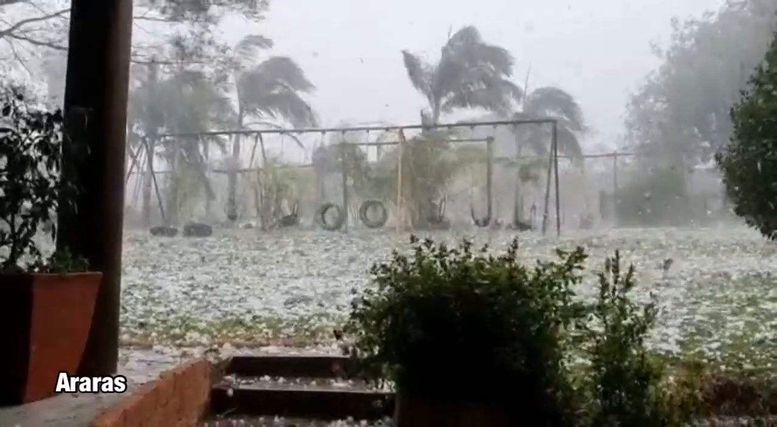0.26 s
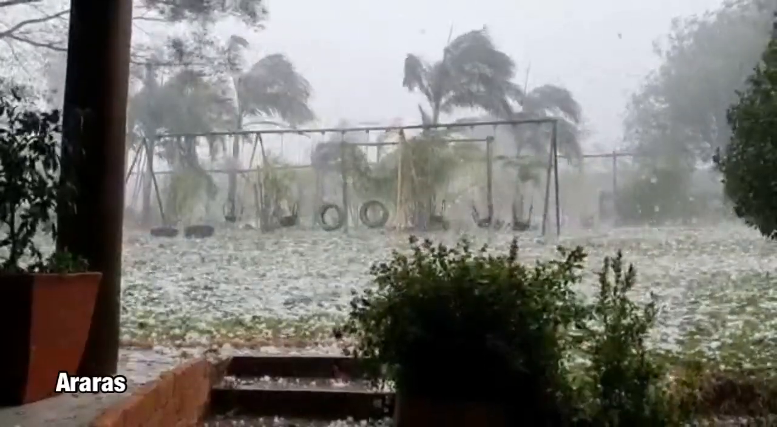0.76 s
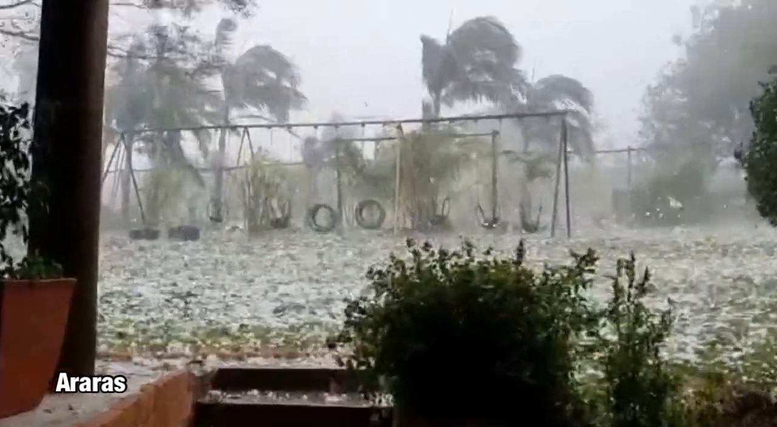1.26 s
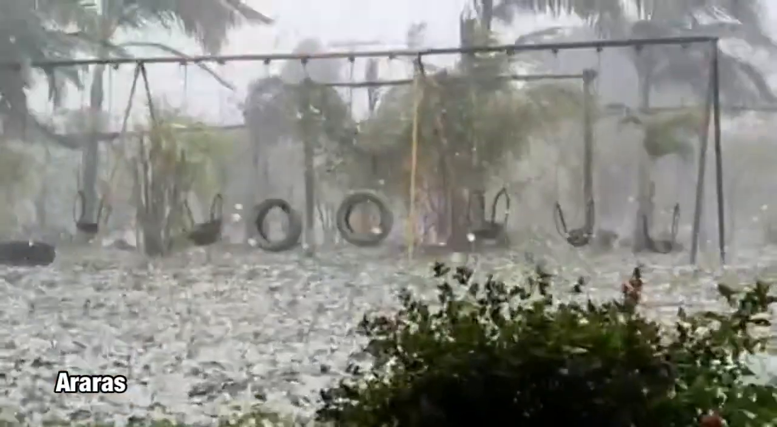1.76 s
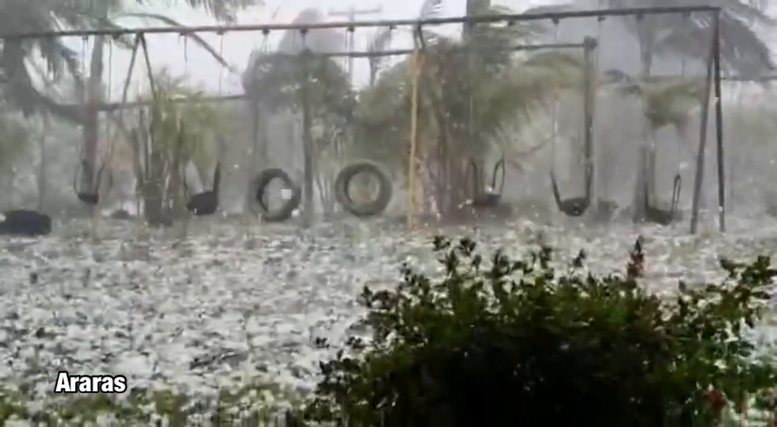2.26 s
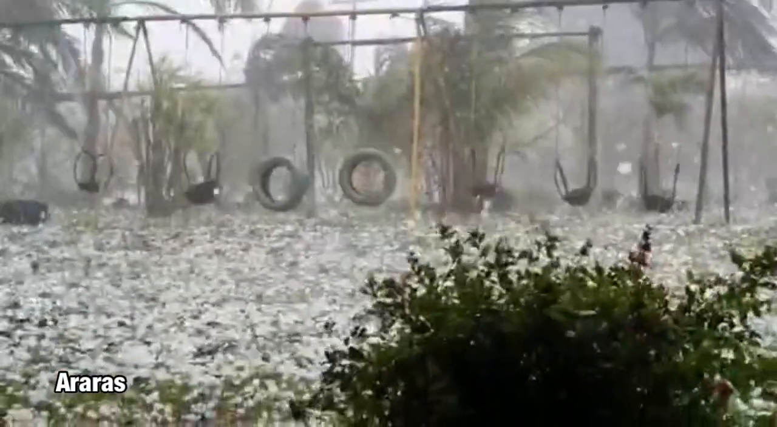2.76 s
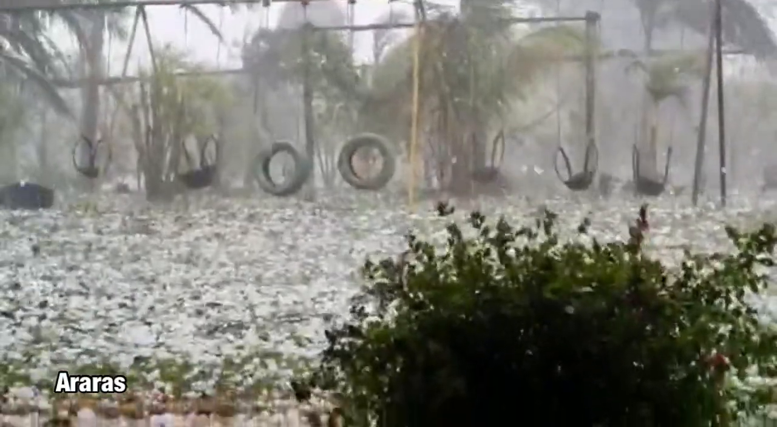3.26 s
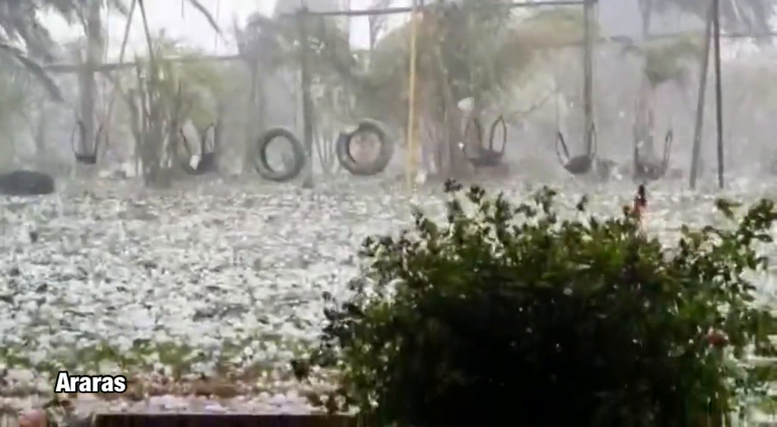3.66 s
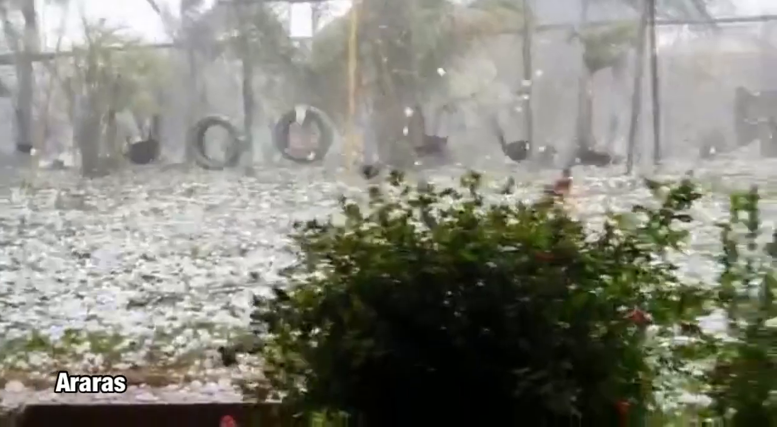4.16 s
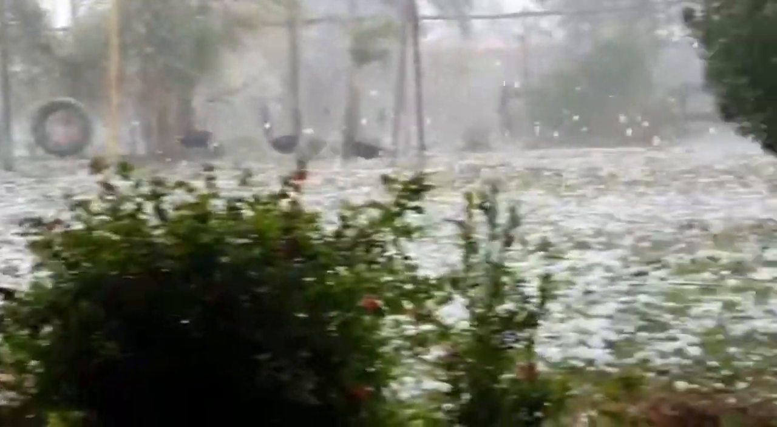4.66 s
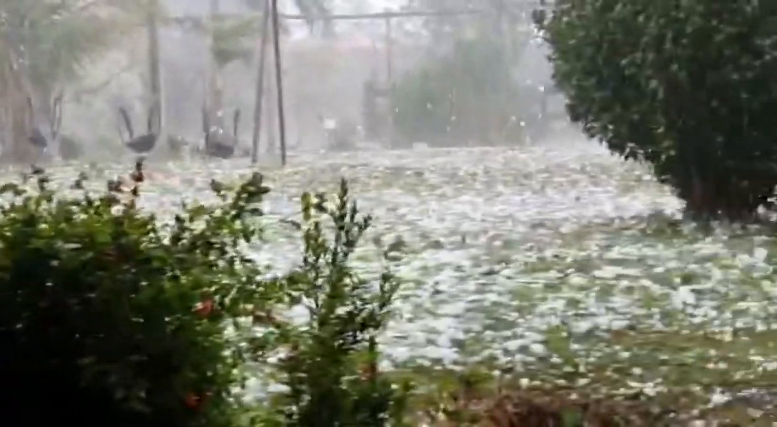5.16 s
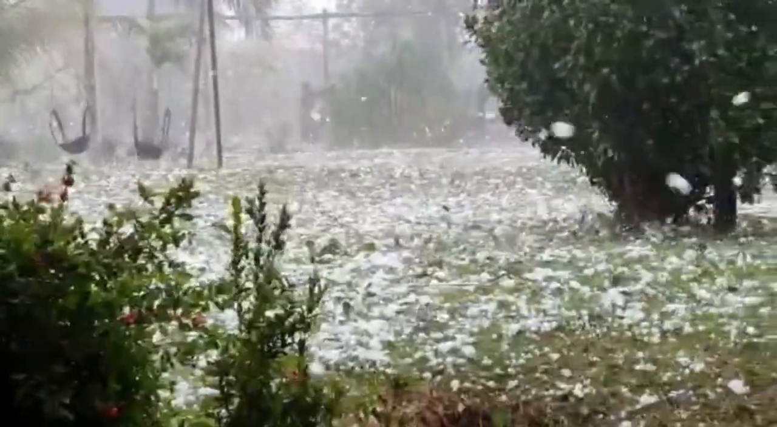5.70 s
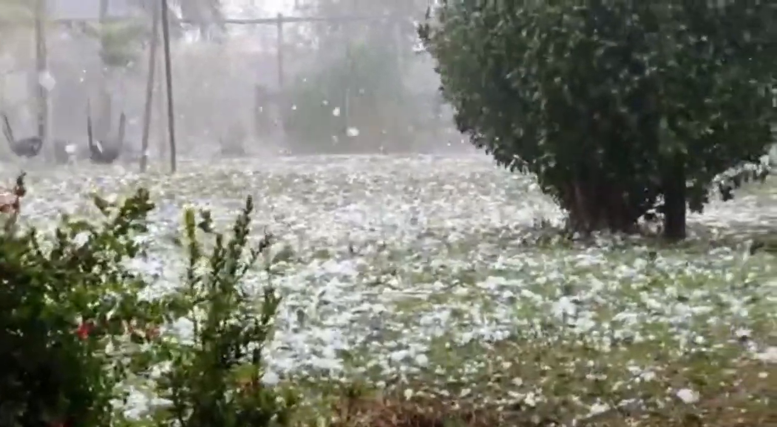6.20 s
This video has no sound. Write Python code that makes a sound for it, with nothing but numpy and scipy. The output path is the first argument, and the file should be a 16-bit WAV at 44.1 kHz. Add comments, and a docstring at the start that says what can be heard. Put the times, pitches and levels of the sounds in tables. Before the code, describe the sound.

Under a porch roof, a dense steady hailstorm clatters and booms while big stones knock overhead and crack on paving.

```python
"""Under a porch roof at the edge of a garden, in heavy wind-driven hail.
Countless stones and noise merge into a roar on lawn and bushes; nearer ones clatter and drum on the roof.
The roof booms: noise through its lowest mode. Single big stones thud, knock on the roof or crack on the paving:
each blow is a coloured smack plus a ring, both smeared by the porch's reflections.
"""
import sys
import numpy as np
from scipy import signal
from scipy.fft import rfft, irfft, next_fast_len
from scipy.io import wavfile

SR = 44100
rng = np.random.default_rng(int(sys.argv[2]) if len(sys.argv) > 2 else 0)


def unload_audio(sound):
    """Save the sound as a 16-bit wav file, at the path given as the first command line argument."""
    columns = np.transpose(np.atleast_2d(sound))
    # keep every value between -1 and 1, then stretch to whole-number steps
    steps = np.round(np.clip(columns, -1, 1) * 32767)
    wavfile.write(sys.argv[1], SR, steps.astype(np.int16))


N = 283843
TIME_S = np.arange(N) / SR

# colour of the whole downpour: (frequency [Hz], relative density [dB per Hz])
ROAR_SPECTRUM = [(22, -14.5), (38, -23), (60, 0.5), (85, -4), (135, 1.5), (240, 0.6), (420, -1.5),
                 (800, -2.5), (2100, -6), (3300, -11), (4100, -19), (4900, -21), (6300, -28), (7400, -36.5),
                 (8250, -26), (9200, -34)]
# broad resonances of the roof panels: (frequency [Hz], width [Hz], gain over the roar [dB])
ROOF_PANELS = [(290, 18, -12.5), (570, 110, -17), (763, 23, -14.5), (1554, 87, -9.5), (1930, 130, -14)]
# strength of the gusts that throw hail on the roof: (time [s], strength [dB])
ROOF_GUST_CURVE = [(0.0, -24.5), (0.28, -24), (0.5, -18), (0.86, -18), (1.0, -23.5), (1.24, -23),
                   (1.5, -16.5), (1.78, -25), (1.96, -20.5), (2.2, -21), (2.5, -19.5), (3.02, -15),
                   (3.33, -24), (3.7, -20.5), (4.12, -19), (4.22, -18.5), (4.68, -20), (4.85, -17),
                   (5.2, -21), (5.34, -14.5), (5.6, -17.5), (6.1, -20.5), (6.44, -17)]
# strength of the shower in the garden: (time [s], strength [dB])
SHOWER_CURVE = [(0.0, -17), (0.18, -17.5), (0.3, -18.5), (0.7, -17.5), (0.8, -18), (0.98, -17.5),
                (1.14, -18.5), (1.28, -17), (1.5, -17.5), (1.6, -17.5), (1.85, -17.6), (2.02, -18),
                (2.14, -18), (2.5, -17.5), (2.8, -17), (3.15, -18), (3.56, -17.5), (3.64, -18.5),
                (3.76, -17), (3.94, -17.5), (4.22, -18), (4.4, -16.5), (4.58, -18), (4.75, -17.5),
                (5.1, -17), (5.22, -18.5), (5.42, -16.5), (5.65, -17.5), (5.8, -17.5), (6.02, -17.5),
                (6.44, -17.5)]
# ice cracking on the paving: (time [s], level [dB], ring [Hz])
PAVING_CRACKS = [(0.095, -25, 4470), (1.356, -33, 7800), (1.996, -34, 7590), (2.312, -24, 4500),
                 (2.372, -30, 5950), (2.742, -27, 5700), (2.859, -36, 7500), (3.017, -27, 5240),
                 (3.429, -34, 6040), (4.381, -30, 6500), (4.82, -25, 4950), (4.914, -28, 5850),
                 (4.927, -36, 8300), (5.614, -36, 6500), (5.745, -28, 5490), (5.787, -28.5, 6340),
                 (6.144, -26, 6200)]
# heavy dull blows on the roof: (time [s], panel level [dB], ring [Hz], bass thump level [dB])
ROOF_THUDS = [(0.696, -25, 247, -24), (0.72, -19, 330, -35), (0.746, -18, 522, -32), (0.831, -19, 376, -25),
              (1.419, -21, 306, -22), (1.457, -17, 630, -29), (1.933, -22, 202, -20.5),
              (1.971, -18, 200, -21), (2.274, -18, 243, -15.5), (2.738, -15, 296, -32.5),
              (3.446, -17.5, 275, -21), (3.812, -19, 466, -25), (4.072, -20, 554, -29),
              (4.101, -18, 500, -29), (4.125, -21, 363, -29), (4.614, -17, 240, -22),
              (4.634, -23, 301, -20), (4.736, -13, 385, -26), (4.77, -18, 390, -40), (4.805, -23, 400, -28),
              (4.928, -14.5, 281, -29), (4.96, -21, 200, -26), (5.12, -21, 272, -15),
              (5.391, -28, 204, -23), (5.728, -22, 288, -21), (5.879, -17.5, 297, -20),
              (6.294, -19.5, 490, -18.5)]
# big stones knocking on the roof: (time [s], body level [dB], ring [Hz], treble re body [dB])
ROOF_KNOCKS = [(0.095, -16.5, 2800, -9), (0.126, -21, 2140, -11), (0.157, -13, 1410, -22),
               (0.906, -16.5, 1440, -10), (1.017, -16.5, 950, -23), (1.427, -14, 1590, -17),
               (1.468, -21, 2380, -12), (1.497, -17, 1450, -26), (1.542, -22, 1500, -9),
               (1.70, -18, 1380, -16), (1.913, -19, 1850, -10), (1.985, -13.5, 795, -18),
               (2.023, -18, 2270, -11), (2.319, -14.5, 2410, -12), (2.419, -13.5, 1190, -15),
               (2.578, -19, 1500, -7.5), (2.595, -19, 2340, -13), (2.649, -15, 1270, -18),
               (2.787, -15.5, 1160, -25), (2.859, -16.5, 980, -15), (2.92, -17, 1980, -9),
               (3.017, -17, 1760, -15), (3.538, -15, 1310, -15), (3.672, -12.5, 1110, -25),
               (3.677, -17.5, 2660, -16), (3.901, -18, 1450, -22), (3.96, -15.5, 3100, -13),
               (3.985, -17, 1500, -18), (4.382, -14.5, 2730, -11), (4.677, -17, 3040, -12),
               (4.822, -12, 1900, -25), (4.831, -17.5, 2700, -24), (4.916, -21, 2400, -9),
               (5.386, -17.5, 1330, -20), (5.416, -32, 2500, -5), (5.474, -21.5, 1220, -6),
               (5.689, -13.7, 1030, -24), (5.757, -15, 2020, -11), (5.786, -16.5, 2620, -12),
               (5.876, -15, 1480, -28), (6.273, -16.5, 1020, -18), (6.381, -15, 2140, -19)]
# smack colours of single blows: (frequency [Hz], relative density [dB per Hz])
CRACK_SPECTRUM = [(800, -17), (3000, 0), (5000, -3), (7400, -26), (9200, -8)]
THUD_SPECTRUM = [(50, -22.5), (130, 3), (280, -1), (550, -2.5), (1200, -9), (4000, -42.5)]
KNOCK_SPECTRUM = [(100, -20), (500, -8.5), (1100, 5), (2600, -3), (4200, -12), (6000, -22.5), (7400, -27.5),
                  (9000, -22)]

# lowest roof mode; its level at mean gust strength and how far it follows the gusts
BOOM_HZ, BOOM_WIDTH_HZ = 95.4, 8.1
BOOM_DB, BOOM_DB_PER_GUST_DB = -30, 0.57
# opening stretch of a blow over which its level is set
CRACK_ONSET_S, THUD_ONSET_S, KNOCK_ONSET_S = 0.007, 0.023, 0.016
# time for the reflections to fall 60 dB
CRACK_T60_S, THUD_T60_S, KNOCK_T60_S = 0.045, 0.11, 0.095
# direct sound of a knock at the mean level; louder knocks are nearer, so more direct
KNOCK_DIRECT, KNOCK_MEAN_DB, DIRECT_DB_PER_DB = 0.44, -14, 1
CUTOFF_HZ = 9150


def from_db(db):
    """Decibels to amplitude gain."""
    return 10 ** (np.asarray(db) / 20)


def rms_one(x):
    """Scale to unit power."""
    return x / np.sqrt(np.mean(x ** 2) + 1e-20)


def swing(curve):
    """A strength curve, sample by sample, in dB about its mean."""
    time_s, strength_db = np.transpose(curve)
    db = np.interp(TIME_S, time_s, strength_db)
    return db - db.mean()


def drift(corner_hz):
    """Slow random curve of unit power: noise through two equal low-pass poles."""
    step = 40  # samples per control point
    warmup = 2000
    pole = np.exp(-2 * np.pi * corner_hz * step / SR)
    noise = rng.standard_normal(N // step + warmup + 2)
    slow = signal.lfilter([1], [1, -2 * pole, pole ** 2], noise)[warmup:]
    return np.interp(np.arange(N) / step, np.arange(len(slow)), rms_one(slow))


def colour(x, spectrum):
    """Minimum-phase filter along a spectrum table, from its folded cepstrum."""
    size = next_fast_len(len(x) // 2 + 4096) * 2
    hz, db = np.transpose(spectrum)
    bins_hz = np.maximum(np.fft.rfftfreq(size, 1 / SR), 1)
    gain_db = np.interp(np.log(bins_hz), np.log(hz), db)
    cepstrum = irfft(np.log(from_db(gain_db)))
    cepstrum[1:size // 2] *= 2
    cepstrum[size // 2 + 1:] = 0
    response = np.exp(rfft(cepstrum))
    return irfft(rfft(x, size) * response)[:len(x)]


def resonance(x, hz, width_hz):
    """Two-pole resonance with about unit gain at its peak."""
    r = np.exp(-np.pi * width_hz / SR)
    zeros = np.array([1, 0, -1]) * (1 - r * r) / 2
    poles = [1, -2 * r * np.cos(2 * np.pi * hz / SR), r * r]
    return signal.lfilter(zeros, poles, x + 1e-18)


def split(x, hz):
    """Parts below and above a fourth-order crossover."""
    parts = []
    for kind in ("low", "high"):
        section = signal.butter(2, hz, kind, fs=SR, output="sos")
        parts.append(signal.sosfilt(np.tile(section, (2, 1)), x))
    return parts


def add(out, time_s, sound):
    """Mix a sound in at a time."""
    start = max(round(time_s * SR), 0)
    out[start:start + len(sound)] += sound[:N - start]


def porch(t60_s, direct, hold_s, size=7000):
    """A blow's path to the ear: direct click, reflections held then decaying; unit energy."""
    decay_db = -60 * np.maximum(TIME_S[:size] - hold_s, 0) / t60_s
    path = rng.standard_normal(size) * from_db(decay_db)
    path /= np.linalg.norm(path)
    path[0] = direct
    return path / np.linalg.norm(path)


def near_hail(spread_db, ring_db, cycles, t60_s, direct, count):
    """Stones land at random, many small and few large, each with its own ring and path."""
    out = np.zeros(N)
    times_s = rng.uniform(0, N / SR, count)
    sizes_db = spread_db * np.minimum(rng.exponential(1, count), 2)
    sizes = from_db(sizes_db) * rng.choice([-1, 1], count)
    rings_hz = np.exp(rng.uniform(np.log(250), np.log(8000), count))
    for time_s, size, hz in zip(times_s, sizes, rings_hz):
        smack = porch(t60_s, direct, hold_s=0, size=1400)
        ring = from_db(ring_db) * resonance(smack, hz, width_hz=hz / cycles)
        add(out, time_s, size * (smack + ring))
    return rms_one(out)


def gusting(sound, strength_db, level_db, db_per_db, flutter_db, flutter_hz):
    """Hail swells with its strength curve and flutters as stones arrive in bunches."""
    gain_db = level_db + db_per_db * strength_db + flutter_db * drift(flutter_hz)
    return from_db(gain_db) * rms_one(sound)


def downpour(gust_db, shower_db):
    """Far roar plus near stones; drumming follows the gusts, clatter and icy spray the shower."""
    far = rng.standard_normal(N)
    near = near_hail(spread_db=0.9, ring_db=16.0, cycles=12.5, t60_s=0.07, direct=0.94, count=5200)
    hail = colour(near + from_db(2.4) * far, ROAR_SPECTRUM)
    panels = sum(from_db(db) * resonance(hail, hz, width_hz) for hz, width_hz, db in ROOF_PANELS)
    drumming, upper = split(hail + panels, 644)
    clatter, spray = split(upper, 3580)
    # level_db holds at mean strength
    drumming = gusting(drumming, gust_db, level_db=-20, db_per_db=0.49, flutter_db=-0.04, flutter_hz=13.5)
    clatter = gusting(clatter, shower_db, level_db=-18.5, db_per_db=1.56, flutter_db=0.4, flutter_hz=10.5)
    spray = gusting(spray, shower_db, level_db=-28.5, db_per_db=2.64, flutter_db=0.33, flutter_hz=3)
    return drumming + clatter + spray


def roof_boom(gust_db):
    """Steady pelting, as noise, keeps the roof's lowest mode ringing, harder in the gusts."""
    mode = resonance(rng.standard_normal(N), BOOM_HZ, BOOM_WIDTH_HZ)
    boom = resonance(mode, BOOM_HZ, 4 * BOOM_WIDTH_HZ)
    return from_db(BOOM_DB + BOOM_DB_PER_GUST_DB * gust_db) * rms_one(boom)


def blow(spectrum, hz, width_hz, ring_share, t60_s, direct, hold_s):
    """One big stone: a broad scattered smack plus the more direct ring of the spot it hits."""
    smack = colour(porch(t60_s, direct / 2, hold_s), spectrum)
    ring = resonance(porch(t60_s, direct, hold_s), hz, width_hz)
    return rms_one(smack) + ring_share * rms_one(ring)


def at_level(sound, db, onset_s):
    """Scale a blow so that its opening has the given level."""
    return sound * from_db(db) / np.std(sound[:int(onset_s * SR)])


def cracks():
    """Ice on hard paving: a short, pitched tick."""
    out = np.zeros(N)
    for time_s, db, hz in PAVING_CRACKS:
        tick = blow(CRACK_SPECTRUM, hz, width_hz=550, ring_share=1.7,
                    t60_s=CRACK_T60_S, direct=0.5, hold_s=0.003)
        add(out, time_s, at_level(tick, db, CRACK_ONSET_S))
    return out


def thuds():
    """Heavy stones shake the roof: the struck panel rings above a short bass thump."""
    out = np.zeros(N)
    for time_s, db, hz, bass_db in ROOF_THUDS:
        thud = blow(THUD_SPECTRUM, hz, width_hz=43, ring_share=1.0,
                    t60_s=THUD_T60_S, direct=0.71, hold_s=0.017)
        bass, panel = split(thud, 187)
        add(out, time_s, at_level(panel, db, THUD_ONSET_S) + at_level(bass, bass_db, THUD_ONSET_S))
    return out


def knocks():
    """Hard stones on the roof: sharp contact adds treble, a loud near one clicks first."""
    out = np.zeros(N)
    for time_s, db, hz, treble_db in ROOF_KNOCKS:
        direct = KNOCK_DIRECT * from_db(DIRECT_DB_PER_DB * (db - KNOCK_MEAN_DB))
        knock = blow(KNOCK_SPECTRUM, hz, width_hz=180, ring_share=0.7,
                     t60_s=KNOCK_T60_S, direct=direct, hold_s=0.014)
        body, edge = split(knock, 3600)
        add(out, time_s, at_level(body, db, KNOCK_ONSET_S) + at_level(edge, db + treble_db, KNOCK_ONSET_S))
    return out


def scene():
    """Everything heard from the porch, in mono."""
    gust_db, shower_db = swing(ROOF_GUST_CURVE), swing(SHOWER_CURVE)
    background = downpour(gust_db, shower_db) + roof_boom(gust_db)
    blows = cracks() + thuds() + knocks()
    return (background + blows)[None]


def record(dry):
    """Round the highest peaks, then cut the top steeply."""
    ceiling = 0.88
    rounded = dry / (1 + (dry / ceiling) ** 6) ** (1 / 6)
    low_pass = signal.ellip(12, 0.2, 80, CUTOFF_HZ, fs=SR, output="sos")
    return signal.sosfilt(low_pass, rounded)


dry = scene()
out = record(dry)
unload_audio(out)
```